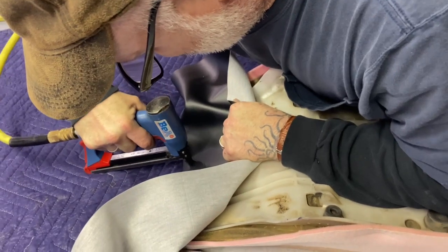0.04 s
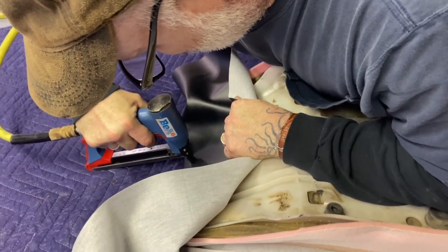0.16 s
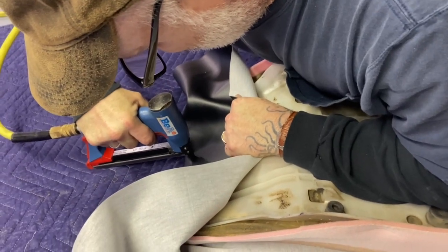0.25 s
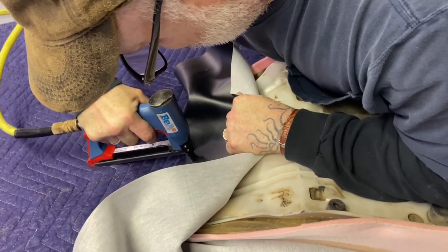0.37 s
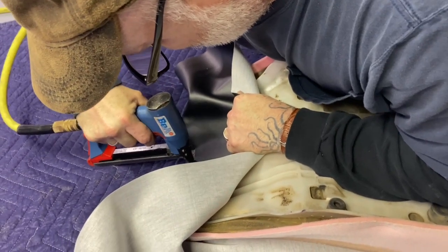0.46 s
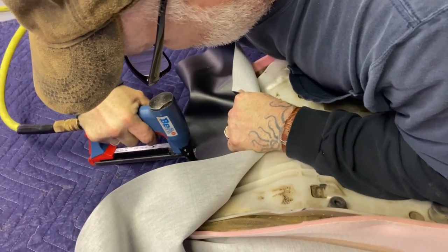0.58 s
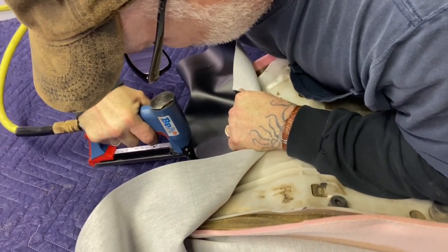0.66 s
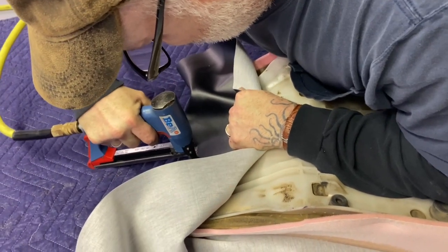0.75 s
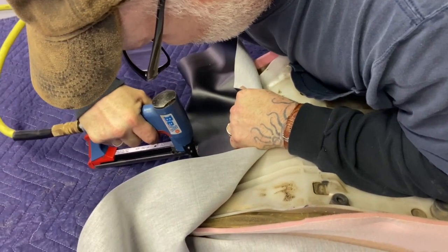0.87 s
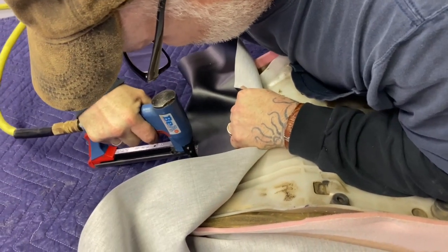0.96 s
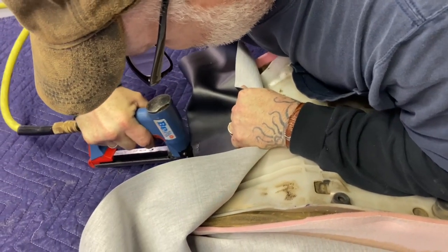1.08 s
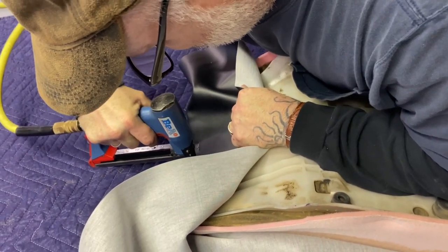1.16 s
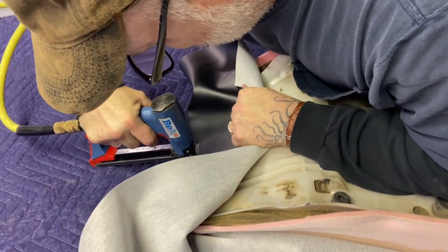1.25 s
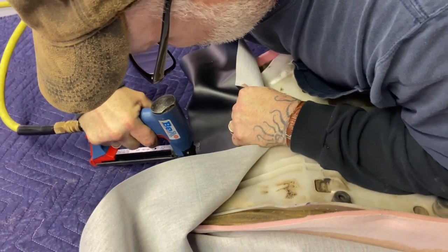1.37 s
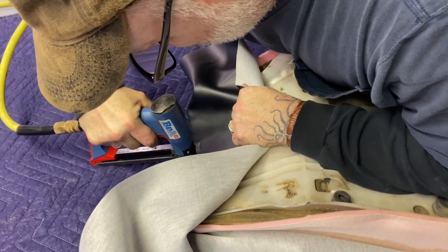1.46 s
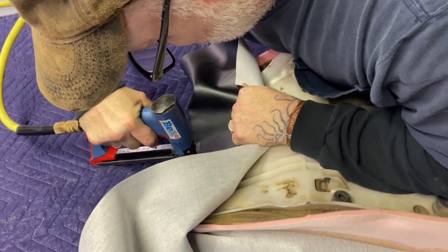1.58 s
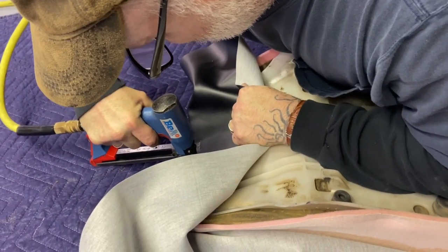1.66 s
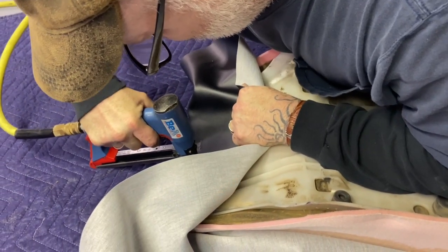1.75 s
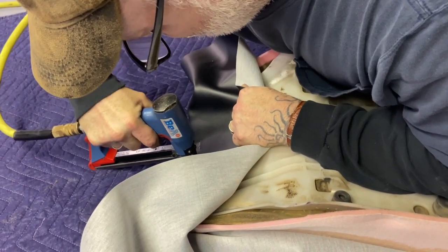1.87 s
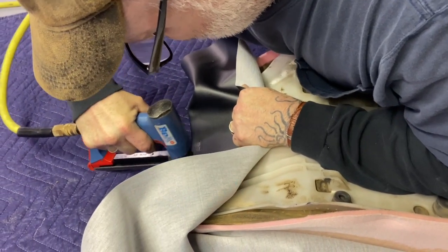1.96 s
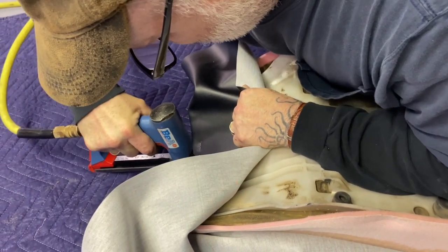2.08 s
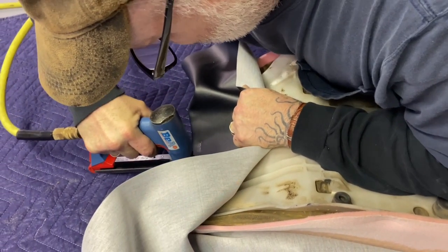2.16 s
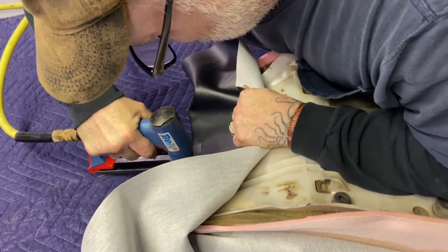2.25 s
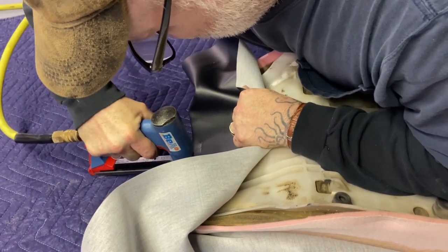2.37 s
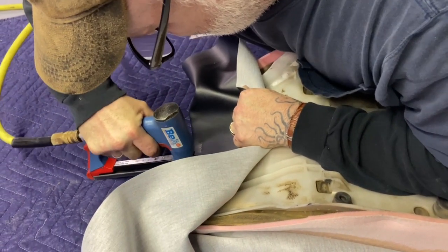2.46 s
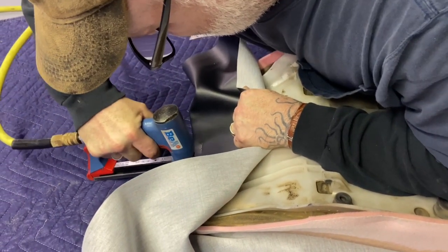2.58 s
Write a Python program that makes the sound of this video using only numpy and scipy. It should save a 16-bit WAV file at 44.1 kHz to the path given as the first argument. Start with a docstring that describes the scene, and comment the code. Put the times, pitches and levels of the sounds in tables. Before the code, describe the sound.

A pneumatic stapler fires close by in a small workshop, with sharp cracks at about 0.3, 0.8 and 1.7 seconds. Roughly a tenth of a second after each shot, the trigger releases with a clack and a short hiss of air. Very faint vinyl crackles fall between the shots. A soft bump comes near 2.1 seconds as the stapler lifts, leaving only a faint low room rumble.

```python
"""A pneumatic stapler drives three staples through vinyl into a seat shell, near a phone in a small workshop.
Turbulent air rushes into the cylinder, then the piston's impacts excite the modes of shell, metal and staple.
On each release a valve clacks, the air vents as a decaying jet and the piston knocks home. The trigger clicks,
the nose lifts with a bump, the vinyl crackles and a sleeve brushes faintly over a low room rumble."""
import sys
import numpy as np
from scipy import signal
from scipy.fft import rfft, irfft
from scipy.io import wavfile

SR = 44100
rng = np.random.default_rng(int(sys.argv[2]) if len(sys.argv) > 2 else 0)


def dump(signal):
    """Clip the signal to [-1, 1] and save it as 16-bit WAV at the path in sys.argv[1]."""
    limited = np.clip(np.atleast_2d(signal).T, -1, 1)
    pcm = np.round(limited * 32767).astype(np.int16)
    wavfile.write(sys.argv[1], SR, pcm)


N = 114660

# shots: time_s, thud_db, crack_db, rush_lead_s, rush_db, rush_rise_s, ping_db
SHOTS = [(0.2605, 1.5, 0.5, 0.046, 1, 0.039, -20), (0.8466, 0.5, -1, 0.031, -2, 0.025, -12.5),
         (1.7367, -.5, -1.5, 0.024, -4.5, 0.015, -5.5)]
# trigger releases: time_s, valve_db, exhaust_db
RELEASES = [(0.3588, -4, -2.5), (0.9855, -0.5, 0), (1.8692, -1.5, -1)]
# modes of the stapler's metal: pitch_hz, level_db, t60_s
METAL_MODES = [(1024, -3.5, .06), (1790, -5, 0.13), (2190, -4.5, 0.05), (2580, -2.5, .07), (2940, -2, .08),
               (4214, -4, .09), (5200, -0.5, .06)]
# spectrum of a hard contact: frequency_hz, level_db
CRACK_SPECTRUM = [(300, -10.5), (900, 1), (1600, -2.5), (2100, 4), (3300, 0.5), (4300, -9), (5800, -8),
                  (7500, -3), (11000, -10.5), (16000, -13)]


def piston_strikes():
    """Impact excitation: each contact cracks and sets shell and metal ringing in their damped modes."""
    # blade meets staple, staple pierces, staple seats, piston stops: delay_s, thud_db, crack_db
    contacts = [(0., -4.5, 3), (.0042, 1.5, -3.5), (.0057, -9.5, -5.5), (.0071, -8, -4)]
    # modes of the seat shell: pitch_hz, level_db, t60_s
    shell_modes = [(218, -9.5, 0.028), (531, -6, 0.014), (655, -8.5, 0.014), (1020, -13, 0.031),
                   (1280, -21, 0.029)]
    # modes of the driver blade and of the staple: pitch_hz, level_db, t60_s
    blade_modes = [(2480, -7.5, .009)]
    staple_modes = [(3110, 1.5, 0.011), (3740, -6, 0.0095)]
    bite_delay_s = 0.0042
    thuds = impulses((s + lag, db + gain) for s, db, *_ in SHOTS for lag, gain, _ in contacts)
    hits = impulses((s + lag, db + gain) for s, _, db, *_ in SHOTS for lag, _, gain in contacts)
    clink = ring(impulses((s, db) for s, _, db, *_ in SHOTS), blade_modes)
    ping = ring(impulses((s + bite_delay_s, db) for s, *_, db in SHOTS), staple_modes)
    low_cut = signal.butter(1, 148, "high", fs=SR, output="sos")
    shell = signal.sosfilt(low_cut, ring(thuds, shell_modes))
    crack = undb(-10) * colour(burst(hits, fall_s=0.0018), CRACK_SPECTRUM)
    return shell + clink + ping + crack + undb(-48.5) * ring(hits, METAL_MODES)


def air_rush(t):
    """Flow noise: air swells through the opening valve and holds until the piston fires."""
    # spectrum of the inflow: frequency_hz, level_db
    rush_spectrum = [(130, -5), (500, -13), (1400, -17), (2400, 1), (3000, -4), (3500, -4.5), (4200, -9),
                     (5000, -2), (5900, -11.5), (7400, -1.5), (9000, -3.5), (10700, 6), (16000, -5.5)]
    flow, cutoff_s = 0, 0.0027
    for s, _, _, lead_s, db, rise_s, _ in SHOTS:
        swell = np.clip((t - s + lead_s) / rise_s, 0, 1) ** 2.6
        flow += undb(db) * swell * np.exp(-np.maximum(t - s, 0) / cutoff_s)
    return undb(-16) * colour(flow * turbulence(), rush_spectrum)


def valve_clacks():
    """Impact excitation on release: valve and returning piston knock, rattle and ring the metal."""
    # valve opens, valve seats, piston comes home: delay_s, level_db
    returns = [(0., 0), (.0024, -13.5), (0.025, -4.5)]
    # spectrum of a knock: frequency_hz, level_db
    knock_spectrum = [(100, -15), (300, 4.5), (560, 5.5), (850, -5.5), (1030, 4), (1300, -16), (2100, 0),
                      (3200, -19), (7000, -20.5), (16000, -21.5)]
    knocks = impulses((s + lag, db + gain) for s, db, _ in RELEASES for lag, gain in returns)
    clack = undb(5.5) * colour(knocks, knock_spectrum)
    rattle = undb(-23.5) * colour(burst(knocks, fall_s=0.005), CRACK_SPECTRUM)
    return clack + rattle + undb(-35) * ring(knocks, METAL_MODES)


def venting(t, fall_s):
    """Pressure relaxation: turbulent outflow starts just after each release and decays exponentially."""
    flow, wait_s, rise_s = 0, 0.003, 0.00072
    for s, _, db in RELEASES:
        age = np.maximum(t - s - wait_s, 0)
        flow += undb(db) * (1 - np.exp(-age / rise_s)) * np.exp(-age / fall_s)
    return flow * turbulence()


def exhaust(t):
    """Jet noise: the cylinder vents with a low puff, a brief sizzle and a hiss that rings the metal."""
    # spectra of hiss, sizzle and puff: frequency_hz, level_db
    hiss_spectrum = [(200, -5.5), (700, -8), (1400, -8), (2000, -4), (2700, -1), (3300, -2.5), (4700, 0.5),
                     (7700, -1), (11000, -1.5), (16000, -5.5)]
    sizzle_spectrum = [(3000, -21), (8000, -9), (11000, 1.5), (16000, -3)]
    puff_spectrum = [(25, -26), (55, -5.5), (110, -2.5), (175, 1.5), (250, -12), (1500, -51)]
    outflow = venting(t, fall_s=0.018)
    hiss = undb(-12.5) * colour(outflow, hiss_spectrum)
    sizzle = undb(-13.5) * colour(venting(t, fall_s=0.007), sizzle_spectrum)
    puff = undb(11) * colour(impulses((s, db) for s, db, _ in RELEASES), puff_spectrum)
    return hiss + sizzle + puff + undb(-54.5) * ring(outflow, METAL_MODES)


def trigger_and_lift():
    """Soft impacts carry little treble: the trigger clicks and the nose bumps as it lifts."""
    # trigger clicks: start_s, level_db
    taps = [(.7875, -4.5), (.7932, 2.5), (.7965, -4.5)]
    # spectra of tap and bump: frequency_hz, level_db
    tap_spectrum = [(100, 7), (450, 0), (700, 2.5), (1300, 2), (1900, -7), (3000, -11.5), (4000, -25),
                    (16000, -31.5)]
    bump_spectrum = [(50, -5.5), (175, 3.5), (330, -19), (540, -5.5), (800, -15), (1400, -29.5),
                     (3500, -41), (7000, -64)]
    lift_s, lift_db = 2.077, -2
    tapping = undb(-30) * colour(burst(impulses(taps), fall_s=0.0016), tap_spectrum)
    return tapping + colour(impulses([(lift_s, lift_db)]), bump_spectrum)


def vinyl_crackles():
    """Friction transients: the stretched vinyl gives short crackles, each with a longer, fainter rub."""
    # crackles: start_s, level_db
    crackles = [(.096, -1), (.145, 0), (.1665, -1), (.611, -0.5), (1.25, -1.5), (1.3165, -0.5), (1.328, -8),
                (1.457, -6), (1.5015, -4), (1.664, -9)]
    # spectrum of the vinyl: frequency_hz, level_db
    vinyl_spectrum = [(200, -15), (900, 3.5), (2000, 8.5), (6000, -13.5), (16000, -26.5)]
    creases = impulses(crackles)
    snap = undb(-58) * burst(creases, fall_s=0.002)
    rub = undb(-72.5) * burst(creases, fall_s=0.025)
    return colour(snap + rub, vinyl_spectrum)


def sleeve(t):
    """Sliding friction: a sleeve brushes the seat with a quick swell and a slow fade."""
    # spectrum of the cloth: frequency_hz, level_db
    cloth_spectrum = [(150, -15), (400, -2.5), (1100, 0), (1700, -13), (16000, -40)]
    start_s, swell_s = 2.235, 0.077
    age = np.maximum(t - start_s, 0) / swell_s
    return undb(-73.5) * colour(age * np.exp(1 - age) * turbulence(), cloth_spectrum)


def echoes(x):
    """Diffuse reverberation: each octave of the room's tail decays exponentially at its own rate."""
    # reverberation time: frequency_hz, t60_s
    decay_times = [(100, 0.33), (600, 0.3325), (2000, 0.39), (5000, 0.388), (10000, 0.36), (16000, 0.2)]
    # echo strength: frequency_hz, level_db
    echo_levels = [(60, -9.5), (200, -15), (600, -15.5), (1500, -16), (3000, -12), (6000, -14.5),
                   (11000, -28), (16000, -35.5)]
    t, hz = np.arange(SR) / SR, np.fft.rfftfreq(SR, 1 / SR)
    noise = rfft(rng.standard_normal(SR))
    tail, wait_s = 0, 0.0035
    onset = np.clip(t / wait_s - 1, 0, 1)
    for centre_hz in 16000 / 2. ** np.arange(9):
        octaves_away = abs(np.log2(np.maximum(hz, 1) / centre_hz))
        band = irfft(noise * np.clip(1 - octaves_away, 0, 1))
        fade = onset * np.exp(-np.log(1000) * t / curve(decay_times, centre_hz))
        tail += undb(curve(echo_levels, centre_hz)) * band * fade / np.linalg.norm(fade)
    return signal.fftconvolve(x, tail)[:N]


def rumble():
    """Stationary noise: the workshop's background has most of its energy in the bass."""
    # spectrum of the background: frequency_hz, level_db
    rumble_spectrum = [(15, -18), (45, -1), (90, 2), (140, -6.5), (185, -22.5), (300, -29.5), (600, -35.5),
                       (1500, -44), (6000, -57), (11000, -49), (16000, -59)]
    return colour(rng.standard_normal(N), rumble_spectrum)


def undb(db):
    """Decibels to amplitude ratio."""
    return 10 ** (np.asarray(db) / 20)


def curve(points, hz):
    """Interpolation of (frequency_hz, value) points on a log-frequency axis."""
    knots_hz, values = np.array(points, float).T
    return np.interp(np.log(np.maximum(hz, 1)), np.log(knots_hz), values)


def colour(x, points):
    """Minimum-phase filter of unit energy: the points set only the shape of the spectrum."""
    cepstrum = irfft(np.log(undb(curve(points, np.fft.rfftfreq(N, 1 / SR)))))
    cepstrum[1:N // 2] *= 2
    cepstrum[N // 2 + 1:] = 0
    response = np.exp(rfft(cepstrum))
    return irfft(rfft(x) * response / np.sqrt(np.mean(abs(response) ** 2)))


def impulses(rows):
    """Ideal impacts: one impulse for each (start_s, level_db)."""
    train = np.zeros(N)
    for s, db in rows:
        train[int(np.clip(s * SR, 0, N - 1))] += undb(db)
    return train


def ring(x, modes):
    """Modal superposition: x drives a sum of damped sinusoids."""
    t = np.arange(SR // 2) / SR
    response = sum(undb(db) * np.sin(2 * np.pi * hz * t) * np.exp(-np.log(1000) * t / t60)
                   for hz, db, t60 in modes)
    return signal.fftconvolve(x, response)[:N]


def burst(x, fall_s):
    """Exponentially decaying noise from each impulse of x."""
    envelope = signal.lfilter([1], [1, -np.exp(-1 / (fall_s * SR))], x)
    return envelope * rng.standard_normal(N)


def turbulence(sputter_hz=700, sputter_db=2):
    """Random amplitude modulation makes noise sputter."""
    knots = np.arange(0, N, SR / sputter_hz)
    noise = rng.standard_normal(N)
    sputter = np.interp(np.arange(N), knots, rng.standard_normal(len(knots)))
    return noise * undb(sputter_db * sputter)


def scene():
    """Superposition of direct sound, reverberation, rumble and a faint hum, in mid and side."""
    t = np.arange(N) / SR
    drift_rad_s, hum_hz = 1.9, 213
    direct = piston_strikes() + air_rush(t) + valve_clacks() + exhaust(t)
    direct += trigger_and_lift() + vinyl_crackles() + sleeve(t)
    # the echo pattern drifts between two tails as the worker moves
    room = echoes(direct * np.cos(drift_rad_s * t)) + echoes(direct * np.sin(drift_rad_s * t))
    side = undb(-11.5) * echoes(direct) + undb(-75.5) * rumble()
    hum = undb(-75) * np.sqrt(2) * np.sin(2 * np.pi * hum_hz * t)
    mid = direct + room + undb(-55) * rumble() + hum
    return np.array([mid + side, mid - side])


def record(dry):
    """Transduction: the phone delays the bass, colours its two ports, rounds peaks and cuts the top."""
    # phase of the left port over the right: frequency_hz, lead_rad
    port_phase = [(0, 0), (700, .35), (1460, .7), (2300, .3), (7400, -.1), (9000, -3.14), (11100, -6.28),
                  (13300, -9.42), (15200, -12.5), (17000, -12.6)]
    # level of the left port over the right: frequency_hz, level_db
    port_balance = [(150, 0.5), (700, 2.5), (1300, 2.5), (2400, 4), (5000, 0)]
    bass_lag_s, bass_corner_hz, top_hz = 0.021, 112, 15900
    hz = np.fft.rfftfreq(N, 1 / SR)
    bass_delay = np.exp(-2j * np.pi * bass_lag_s * bass_corner_hz * np.arctan(hz / bass_corner_hz))
    lead_rad = np.interp(hz, *np.array(port_phase).T)
    balance_db = curve(port_balance, hz)
    ports = np.array([undb(balance_db / 2) * np.exp(1j * lead_rad), undb(-balance_db / 2)])
    heard = irfft(rfft(dry) * bass_delay * ports)
    low_pass = signal.ellip(8, 0.2, 80, top_hz, fs=SR, output="sos")
    return signal.sosfilt(low_pass, np.tanh(heard))


dry = scene()
out = record(dry)
dump(out)
```